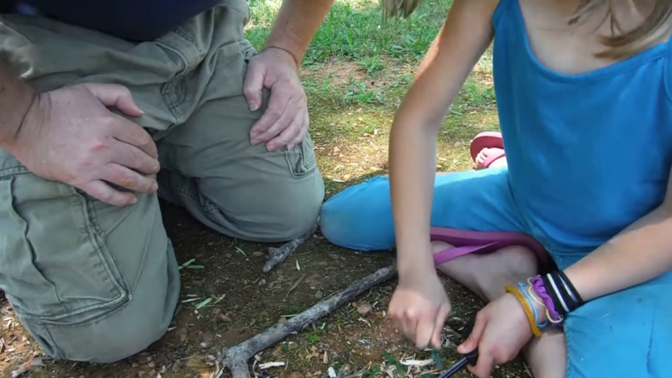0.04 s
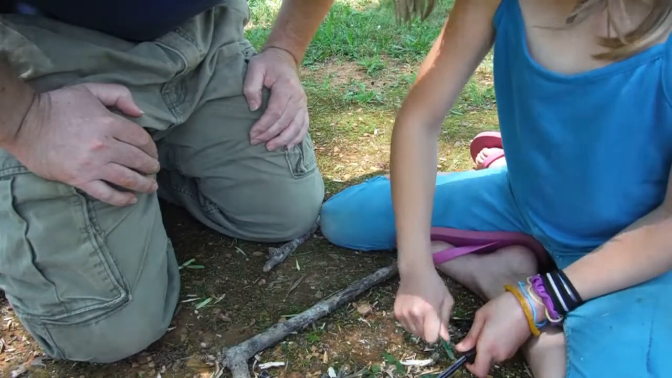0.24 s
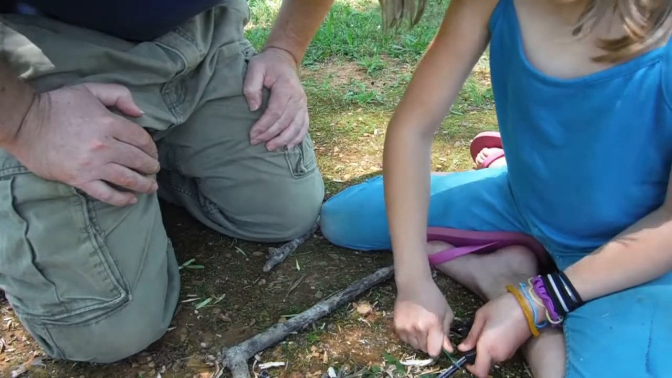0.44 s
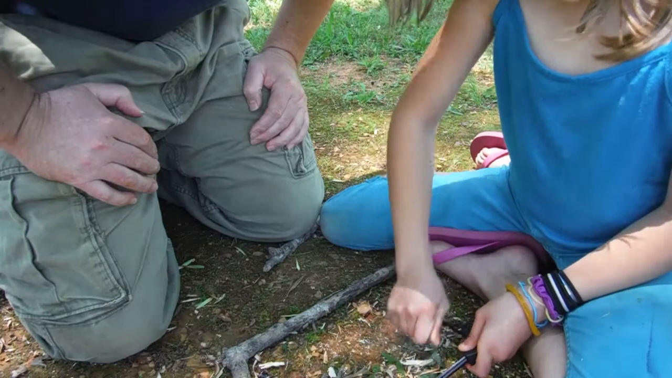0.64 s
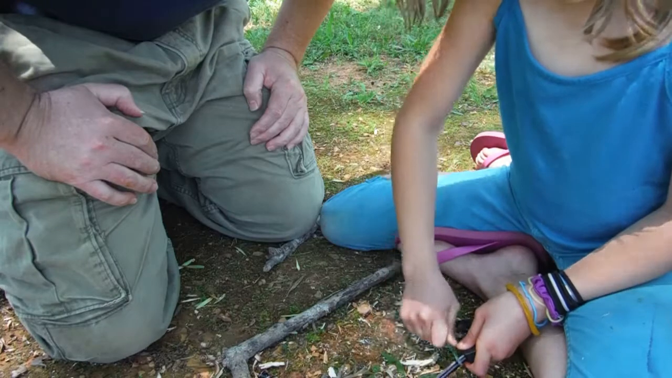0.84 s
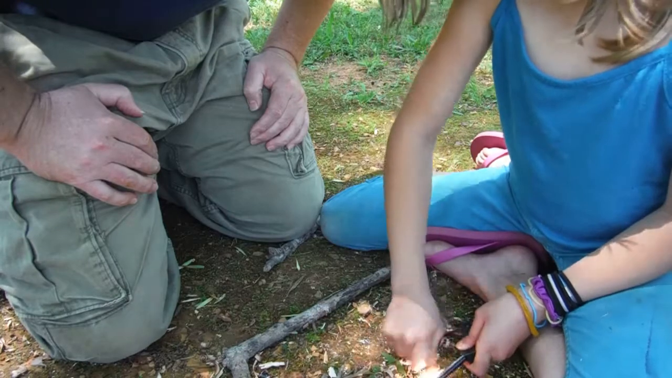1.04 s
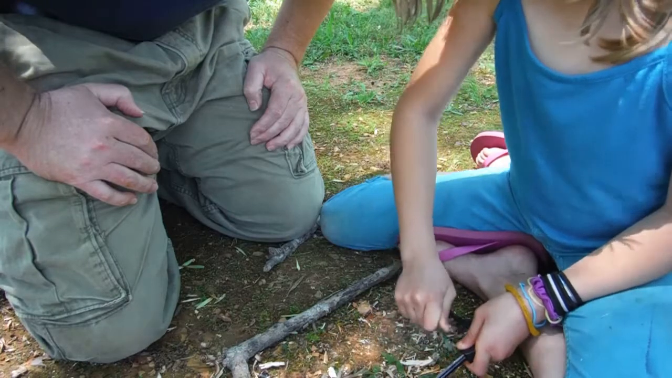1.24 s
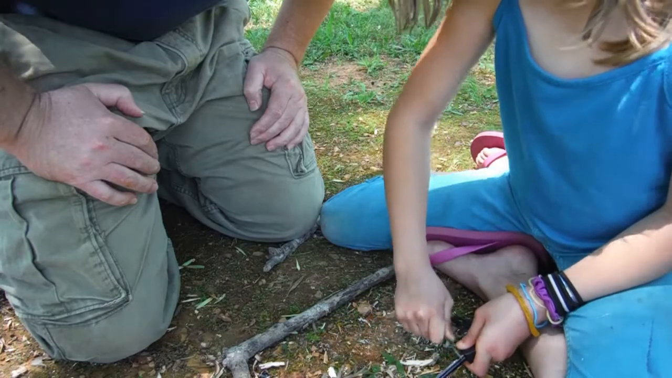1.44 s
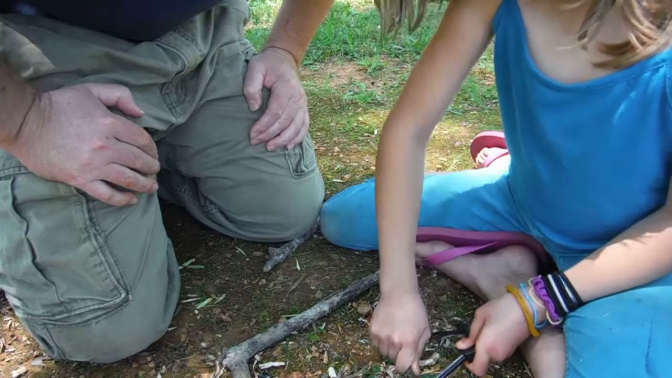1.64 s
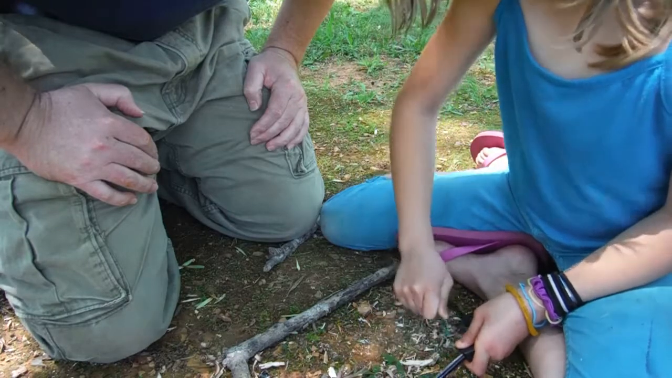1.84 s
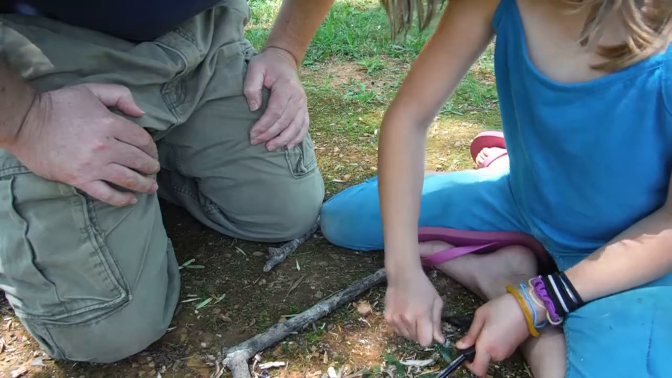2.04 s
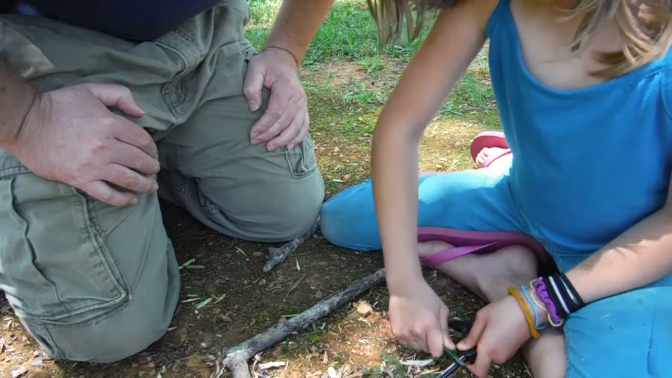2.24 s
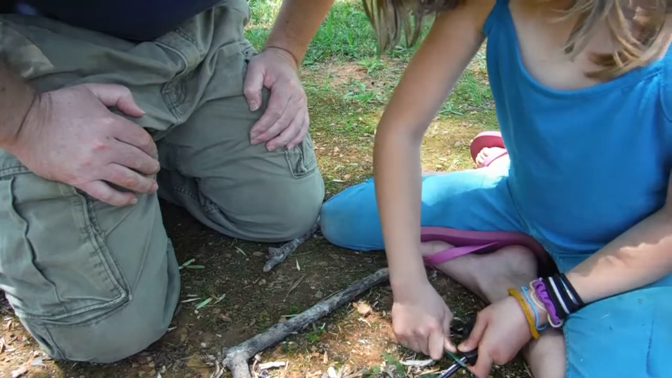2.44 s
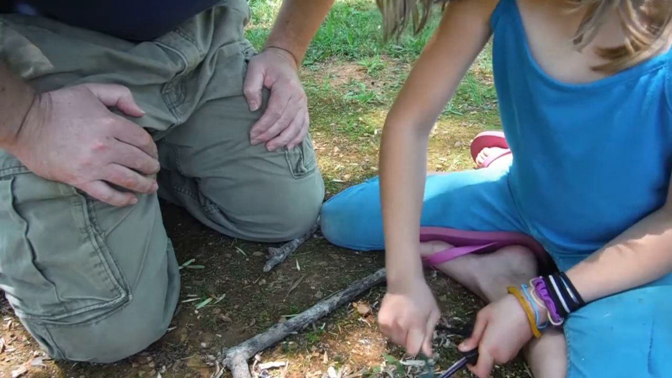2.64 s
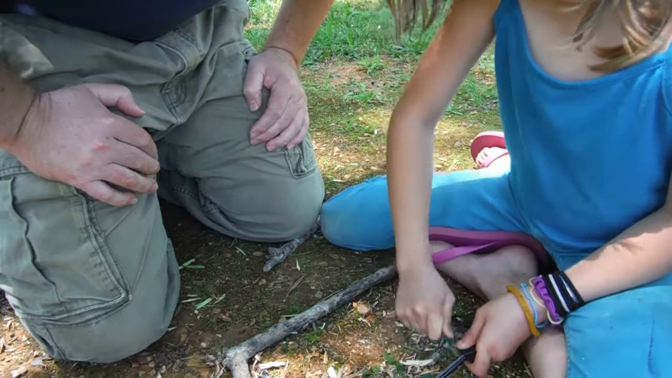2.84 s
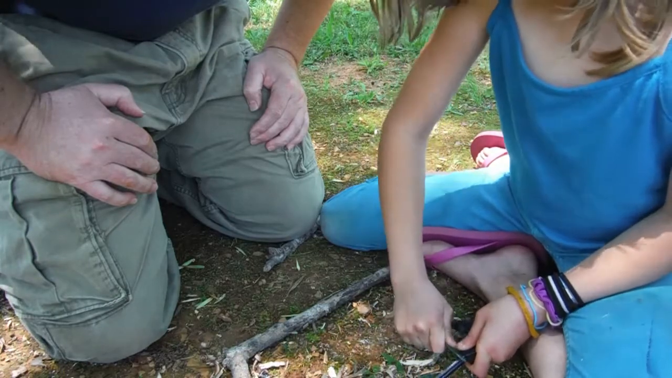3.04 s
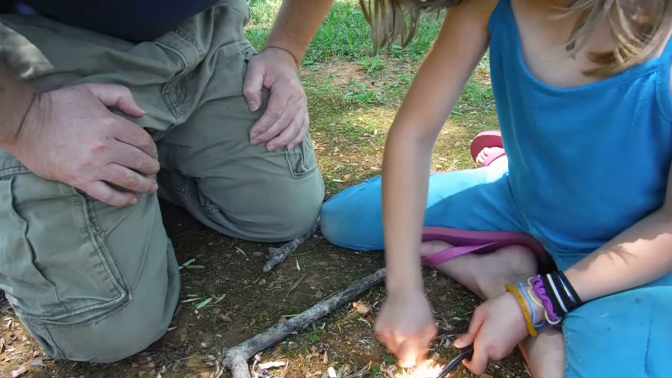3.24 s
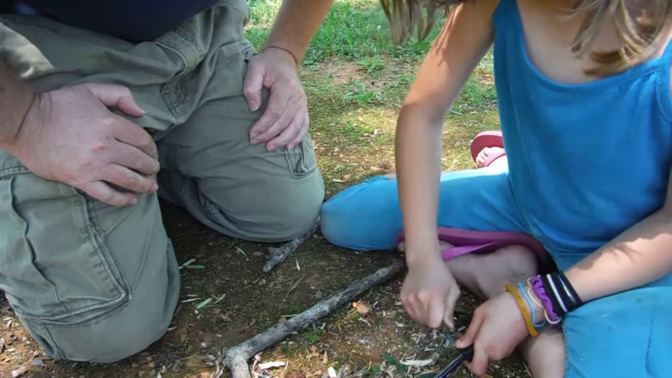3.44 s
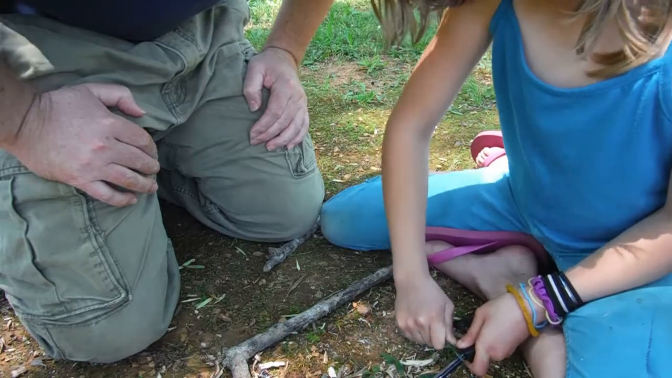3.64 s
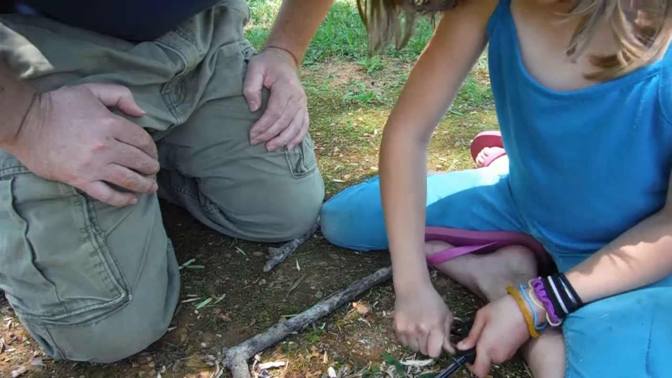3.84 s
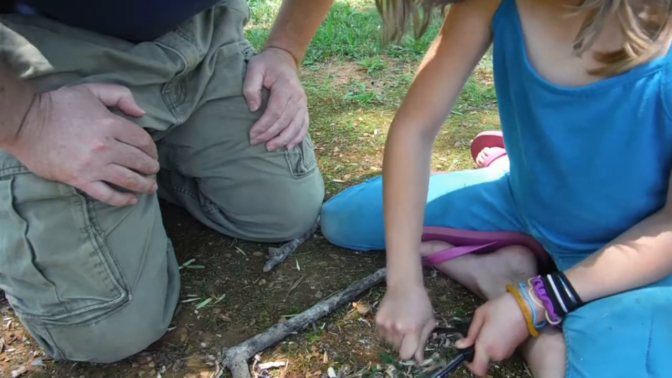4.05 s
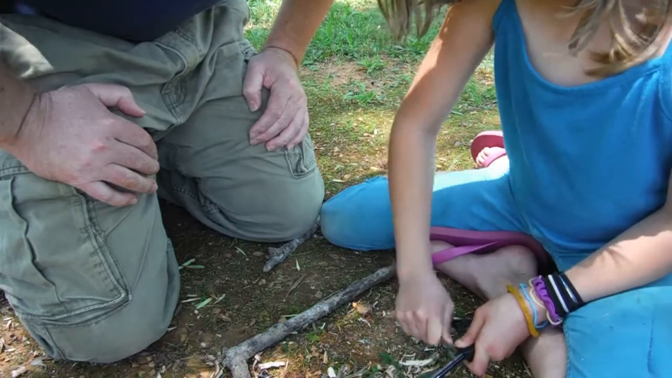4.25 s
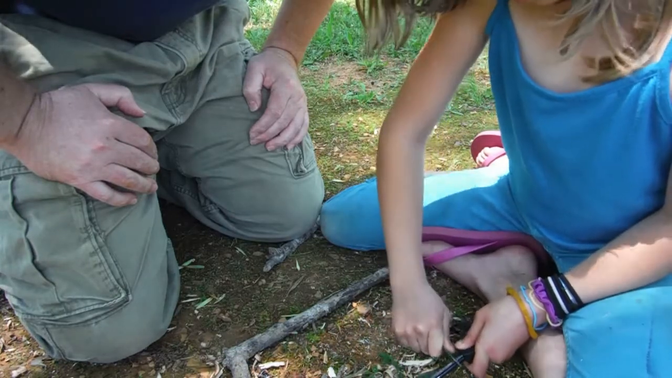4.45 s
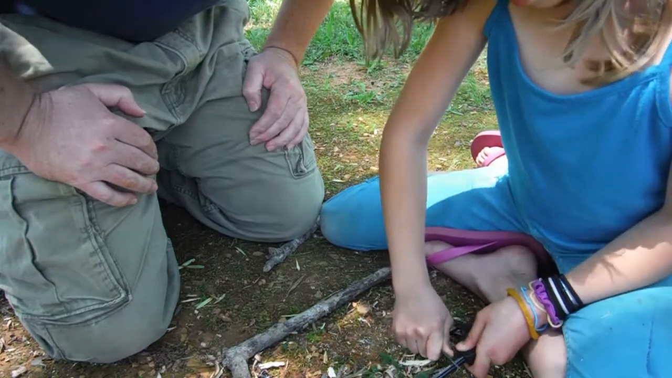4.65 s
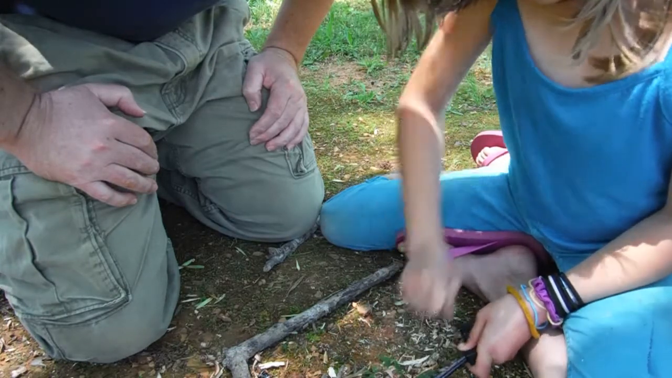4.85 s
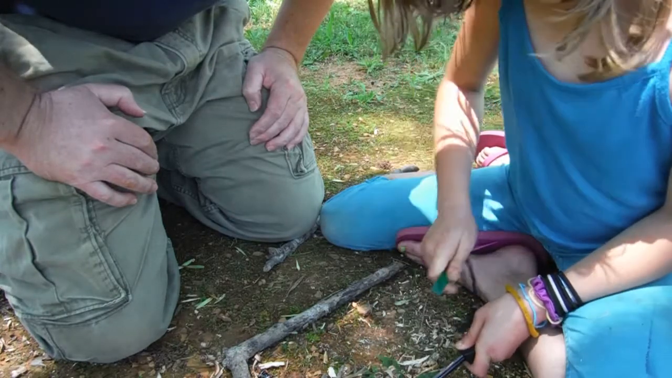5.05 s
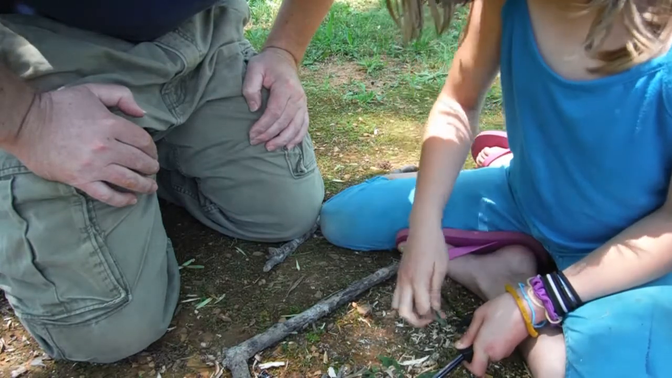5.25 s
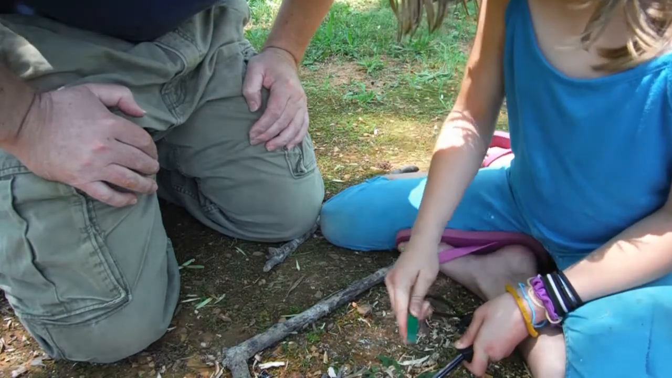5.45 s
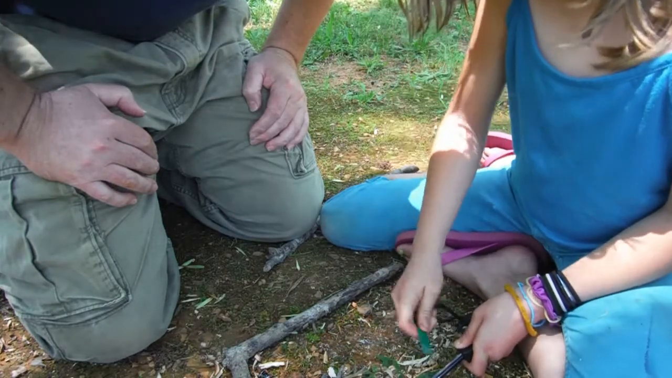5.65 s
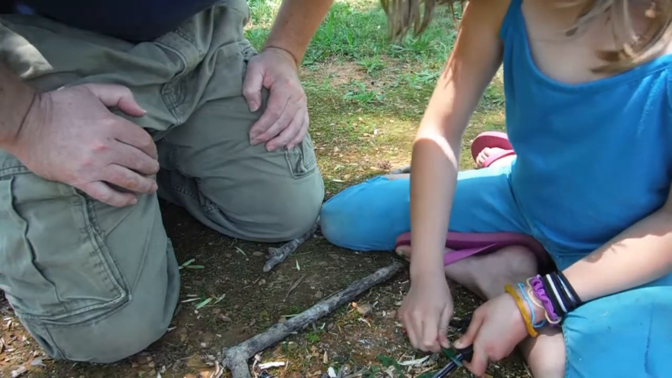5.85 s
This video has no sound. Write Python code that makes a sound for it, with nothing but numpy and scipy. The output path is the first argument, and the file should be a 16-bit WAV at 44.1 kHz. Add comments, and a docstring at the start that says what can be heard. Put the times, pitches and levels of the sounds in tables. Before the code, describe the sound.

About a dozen short, dry rasps of steel on a ferro rod, unevenly spaced, each very brief, with hard clicks as the edge touches the rod again. Sparks spit and pop, and a few strokes catch with a piercing squeak. Behind is soft outdoor rumble, a far engine running down early on, low hum and faint high hiss. Scraping stops before five seconds; then small ticks, dull thuds and a light knock. Near mono pickup, almost no reverberation.

```python
"""Outdoors, near the ground, a steel striker is pushed along a ferro rod again and again.
Strokes are dense random grains through a rasp colour and a steel ring; taps ring, crack and bounce.
Sparks are sparse grains that swell into flares, with spiky pops; the edge catches in short, rough squeaks.
Hands bump the earth and the striker is set down. Behind, filtered noise makes open air, sine stacks make
a far engine that runs down and a hum, and a camera adds a faint whine and hiss."""
import sys
import numpy as np
from scipy import signal
from scipy.fft import rfft, irfft, next_fast_len
from scipy.io import wavfile
from scipy.ndimage import uniform_filter1d, minimum_filter1d, map_coordinates

SR = 44100
rng = np.random.default_rng(int(sys.argv[2]) if len(sys.argv) > 2 else 0)


def to_wav(s):
    """Save 16-bit WAV."""
    ch = np.atleast_2d(s).T  # columns
    pcm = np.round(np.clip(ch, -1, 1) * 32767)  # PCM
    wavfile.write(sys.argv[1], SR, pcm.astype(np.int16))


N = 260190
TIME = np.arange(N) / SR

# pushes along the rod: start_s, press_s, ease_s, level_db where pressing ends,
# swell_db while pressing (negative falls), treble_tilt_db
STROKES = [ (0.0, 0.017, .004, -24, 4.5, -0.5), (.553, .022, 0.066, -25, 5, 2.5),
           (1.049, .04, 0.077, -24.5, 7.5, 0), (1.235, 0.0028, 0.0039, -24.5, -5, 6.5),
           (1.555, 0.087, 0.0036, -21.5, 11.5, 1), (2.572, 0.024, .097, -23.5, 5, 1),
           (3.252, 0.062, 0.015, -22.5, 3.5, 2), (3.817, 0.019, .007, -31.5, 6, 0.5),
           (3.941, .005, 0.0063, -28.5, -1, 1.5), (3.997, .003, .005, -26, 6, -4),
           (4.025, 0.026, 0.0078, -24, 20, -3), (4.644, 0.016, .002, -31.5, -1, 0.5),
           (4.741, 0.038, 0.025, -20, 11, -1.5), ]
# showers of sparks as shavings ignite: peak_s, crackle_db, decay_s
FLARES = [(0.014, -30.5, .004), (0.598, -31, 0.022), (1.094, -34, .005), (1.128, -26, 0.006),
          (1.16, -25.5, 0.0035), (1.638, -23, 0.0051), (2.618, -28, 0.014), (3.309, -22.5, 0.0085),
          (4.049, -36.5, 0.0035), (4.789, -29, 0.0071)]
# striker touching the rod: start_s, level_db averaged over CONTACT_S
TAPS = [(0.3756, -18), (0.532, -30.5), (0.6955, -40), (0.9301, -20), (1.5057, -14.5), (1.549, -32),
        (2.1976, -20.5), (3.0228, -22), (3.1173, -35), (3.357, -36), (3.7073, -27), (3.7759, -39),
        (4.022, -33), (4.1155, -34), (4.3784, -24), (4.834, -34), (5.275, -38.5), (5.2915, -37),
        (5.876, -21.5)]
# loudest sparks bursting: start_s, peak_db
SPARK_POPS = [(.6338, -13), (1.1236, -9.5), (1.1388, -8), (1.6422, -5), (3.3197, -3.5), (4.7676, -12),
              (4.7895, -11), (4.799, -11.5)]
# edge catching and squeaking: peak_s, level_db, pitch_hz, decay_s
CATCHES = [(1.0881, -15, 7000, 0.00046), (1.586, -17, 6400, .0006), (3.2705, -13, 6940, .0005),
           (3.3272, -13, 7150, 0.00035), (3.8229, -23.5, 6500, 0.00045), (3.944, -18, 6900, .0005),
           (3.951, -23, 6500, .0005), (3.999, -17.5, 7480, .0003), (4.042, -19, 5850, 0.0038),
           (4.0488, -2.5, 6440, 0.00037), (4.6476, -23, 5500, 0.00043), (4.659, -19.5, 6060, .0004),
           (4.746, -13.5, 6570, 0.00068), (4.777, -17, 5500, .0016), (4.7814, 7.5, 5630, 0.00085),
           (4.7832, -9.5, 3470, 0.00084)]
# hands bumping the ground: bump_s, peak_db
HAND_BUMPS = [(3.712, -35), (3.818, -32), (3.897, -35), (4.145, -27.5), (4.394, -30.5), (4.647, -19.5),
              (5.785, -33.5), (5.893, -28.5)]

# ring modes of the hand-held striker and rod: pitch_hz, level_db, t60_s
STEEL_MODES = [(2850, -20, 0.024), (4230, -27, 0.017), (5220, 0, 0.012), (5500, 5.5, 0.0043),
               (6320, -12, 0.01), (6760, -17, 0.0051), (7300, -4.5, 0.0043), (7860, -12, 0.008),
               (9140, -7.5, 0.011), (9650, -7.5, 0.0076)]
# filter colour of grains shearing off the rod: freq_hz, gain_db
SHEAR_COLOUR = [(300, -60), (1500, -6.5), (3800, -8.5), (5200, 5), (7300, 2), (9300, 1.5), (10500, -9.5),
                (13000, -13.5), (15800, -21)]
# filter colour of burning sparks: freq_hz, gain_db
CRACKLE_COLOUR = [(100, -6.5), (300, 0.5), (1600, 0), (2300, 0.5), (2800, 5), (3900, -3.5), (5000, 1.5),
                  (9000, 0), (12000, -3.5), (15800, -24)]
# filter colour of the crack in a tap: freq_hz, gain_db
CRACK_COLOUR = [(300, -41), (1700, -18), (2800, -4.5), (4000, -8), (5300, 8), (9500, -5), (11000, -9),
                (15800, -27)]
# filter colour of a hand on soft earth: freq_hz, gain_db
THUD_COLOUR = [(20, -27), (50, -0.5), (90, -0.5), (180, -2), (300, -12), (700, -36), (3000, -75)]
# filter colour of the open air: freq_hz, gain_db
AIR_COLOUR = [(15, -8), (30, 2), (70, -3), (100, -5), (128, -10), (175, -11), (290, -22), (580, -21),
              (1000, -19.5), (2100, -24), (3300, -25), (5000, -21), (6800, -29.5), (9600, -50)]
# filter colour of the camera hiss: freq_hz, gain_db
HISS_COLOUR = [(3000, -24), (6500, -10.5), (7800, 4.5), (8800, -1.5), (9900, -8.5), (10450, -13),
               (10850, -5.5), (11300, -13), (12500, -16.5), (15800, -15.5)]
# filter colours of squeak grit, soil bounce and the striker set down: freq_hz, gain_db
GRIT_COLOUR = [(500, -56), (2000, -5), (3300, 5.5), (6000, 11.5), (9500, 4.0), (12000, -22), (15000, -31)]
SOIL_COLOUR = [(3500, -11.0), (9000, -4)]
SET_DOWN_COLOUR = [(200, -14), (600, 6), (1800, -5), (4500, -8), (12000, -33)]

# drifting open-air levels: time_s, rumble_db, wash_db, rustle_db
AIR_LEVELS = [(0, -37.5, -42, -43), (.85, -42.5, -43, -45), (2.2, -44, -46, -47), (3.8, -42.5, -47.5, -46),
              (4.95, -46, -48.5, -47), (5.9, -40.5, -48.5, -47.5)]
# far engine before it fades: time_s, level_db
ENGINE_LEVELS = [(0, -31), (.5, -37.5), (1.0, -35.5), (1.9, -41)]
# engine firing tone, then its overtones: level_db
EXHAUST_DB = [0, -16.5, -18.5]
# background hum tones: pitch_hz, level_db
HUM_TONES = [(99, -47.5), (159, -56)]
# thin top lines of the camera whine: pitch_hz, level_db
WHINE_LINES = [(11835, -70.5), (15734, -63), (15747, -65)]

BITE_S, EASE_DB, LIFT_DB_PER_S = 0.0023, 8, 900  # stroke attack, fall while easing, release
DRAG_DB, DRAG_DB_PER_S = -19, 168  # the lifted edge trails over the rod
EMBER_DB = -19.5  # crackle that goes with any scraping, relative to the stroke level
FLARE_SNAP = 1.32  # a flare grows this many times faster than it dies
CONTACT_S = .004
IDLE_HZ, SHUT_OFF_S, COAST_S, FADE_DB_PER_S = 70.6, 2.0, 1.7, 24  # the engine slows and fades
TOP_HZ = 16000


def amp(db):
    """Decibels to gain."""
    return 10 ** (np.asarray(db) / 20)


def unit(x):
    """Scale to rms 1."""
    return x / np.sqrt(np.mean(x ** 2) + 1e-20)


def curves(rows):
    """One value per sample for each column after the time."""
    time_s, *columns = np.transpose(rows)
    return [np.interp(TIME, time_s, column) for column in columns]


def wobble(rate):
    """A smooth random curve with rate knots a second."""
    knots = rng.standard_normal(int(N * rate / SR) + 4)
    return map_coordinates(knots, [TIME * rate])


def coloured(x, points):
    """Causal minimum-phase filter through (freq_hz, gain_db) points."""
    size = 2 * next_fast_len(len(x) // 2 + 4096)
    freq_hz, gain_db = np.transpose(points)
    log_hz = np.log(np.fft.rfftfreq(size, 1 / SR) + 1)
    gain = amp(np.interp(log_hz, np.log(freq_hz), gain_db))
    # folding the cepstrum forward keeps energy from leading the attack
    cepstrum = irfft(np.log(gain + 1e-6))
    cepstrum[1:size // 2] *= 2
    cepstrum[size // 2 + 1:] = 0
    response = np.exp(rfft(cepstrum))
    return irfft(rfft(x, size) * response, size)[:len(x)]


def add(track, start_s, sound):
    """Mix a sound into the track from start_s."""
    start = max(round(start_s * SR), 0)
    part = track[start:start + len(sound)]
    part += sound[:len(part)]


def swell(t, decay_s, snap):
    """A rounded peak at t = 0 that rises snap times faster than it dies."""
    speed = np.where(t < 0, snap, 1)
    return 1 / np.cosh(np.clip(t / decay_s * speed, -20, 20))


def grains(rate, spread_db):
    """Tiny impulses of random sign and size, on average rate a second."""
    size_db = spread_db * np.clip(rng.standard_normal(N), -2, 2)
    sizes = amp(size_db) * np.sign(rng.standard_normal(N))
    return sizes * (rng.random(N) < rate / SR)


def steel_ring(detune, attack_s=.0001):
    """Decaying steel modes, their pitch, level and phase shifted at random each time."""
    t = np.arange(SR // 40) / SR
    pitch_hz, level_db, t60_s = np.transpose(STEEL_MODES)[:, :, None]
    size, shift, phase = rng.standard_normal((3, len(STEEL_MODES), 1))
    envelopes = amp(level_db + 2 * size - 60 * t / t60_s)
    modes = envelopes * np.sin(2 * np.pi * (pitch_hz * (1 + detune * shift) * t + phase))
    wave = modes.sum(0) * (1 - np.exp(-t / attack_s))
    return wave / np.linalg.norm(wave)


def stroke_level(start_s, press_s, ease_s, swell_db):
    """The edge bites, bears down, eases and lifts, trailing lightly; gain is 1 where pressing ends."""
    t = TIME - start_s
    force_db = np.interp(t, [0, press_s, press_s + ease_s], [-swell_db, 0, -EASE_DB])
    lifted_s = np.maximum(t - press_s - ease_s, 0)
    released_db = force_db - LIFT_DB_PER_S * lifted_s
    drag_db = DRAG_DB - DRAG_DB_PER_S * lifted_s
    return np.clip(t / BITE_S, 0, 1) * amp(np.maximum(released_db, drag_db))


def strokes(rock_db=2.0, judder_db=2.5, steel_db=-18.0):
    """The edge shears grains off the rod; they crackle faintly all along and louder where they flare."""
    shear = grains(rate=6000, spread_db=2.5)
    rasp = unit(coloured(shear, SHEAR_COLOUR))
    freq_hz = np.fft.rfftfreq(N, 1 / SR)
    dull = irfft(rfft(rasp) / (1 + (freq_hz / 7000) ** 8), N)
    bright = rasp - dull
    rocking_db = rock_db * wobble(90)  # the edge rocks in the hand: brighter and duller by turns
    judder = unit(amp(judder_db * wobble(200)))  # stick-slip breaks the rasp into short bites
    sparks = unit(coloured(grains(rate=2500, spread_db=5), CRACKLE_COLOUR))
    out = np.zeros(N)
    for start_s, press_s, ease_s, level_db, swell_db, tilt_db in STROKES:
        tilt = amp(tilt_db + rocking_db)
        grit = unit(dull / tilt + tilt * bright)
        steel = unit(signal.oaconvolve(shear, steel_ring(detune=0.029))[:N])
        scrape = judder * (grit + amp(steel_db) * steel)
        level = amp(level_db) * stroke_level(start_s, press_s, ease_s, swell_db)
        out += level * (scrape + amp(EMBER_DB) * sparks)
    for peak_s, crackle_db, decay_s in FLARES:
        out += amp(crackle_db) * swell(TIME - peak_s, decay_s, FLARE_SNAP) * sparks
    return out


def ground(x, bounce_s=0.00154, bounce_db=-11, wet_db=-16, t60_s=0.032):
    """Earth under the rod returns one quick copy; knees and grass scatter a brief, weak tail."""
    t = np.arange(SR // 10) / SR
    tail = rng.standard_normal(len(t)) * amp(-60 * t / t60_s) * (t > .002)
    out = x + amp(wet_db) * signal.oaconvolve(x, tail / np.linalg.norm(tail))[:N]
    add(out, bounce_s, amp(bounce_db) * coloured(x, SOIL_COLOUR))
    return out


def outdoors():
    """Open-air noise in three bands, each drifting on its own: rumble, distant wash and high rustle."""
    air = rfft(coloured(rng.standard_normal(N), AIR_COLOUR))
    freq_hz = np.fft.rfftfreq(N, 1 / SR)

    def band(low_hz, high_hz):
        """One slice of the air at rms 1."""
        inside = (freq_hz >= low_hz) & (freq_hz < high_hz)
        return unit(irfft(air * inside, N))

    rumble_db, wash_db, rustle_db = curves(AIR_LEVELS)
    rumble = amp(rumble_db + 2.2 * wobble(7)) * band(22, 250)
    wash = amp(wash_db + .4 * wobble(9)) * band(250, 3200)
    rustle = amp(rustle_db + 1.45 * wobble(18)) * band(3200, 9000)
    return rumble + wash + rustle


def engine():
    """A far engine's firing tone and overtones idle unevenly, then sink in pitch and fade once shut off."""
    idle_db, = curves(ENGINE_LEVELS)
    coasting_s = np.maximum(TIME - SHUT_OFF_S, 0)
    pitch_hz = IDLE_HZ * np.exp(-coasting_s / COAST_S)
    level_db = idle_db - FADE_DB_PER_S * coasting_s
    phase = 2 * np.pi * np.cumsum(pitch_hz * (1 + 0.0048 * wobble(7.7))) / SR
    exhaust = sum(amp(db) * np.sin(k * phase) for k, db in enumerate(EXHAUST_DB, 1))
    return np.sqrt(2) * amp(level_db + 0.74 * wobble(11.9)) * exhaust


def hum():
    """Low sine tones go on throughout, wavering in level and phase."""
    out = np.zeros(N)
    for pitch_hz, level_db in HUM_TONES:
        level = amp(level_db + 2.2 * wobble(5.02))
        out += level * np.sin(2 * np.pi * pitch_hz * TIME + 0.84 * wobble(6))
    return np.sqrt(2) * out


def camera(tone_db=-45.0, hiss_db=-48.5):
    """The camera's whine: a tone flipping sign once per picture field, thin top lines that beat, and hiss."""
    tone_hz, field_hz = 7867, 59.94
    flips = np.tanh(8 * np.sin(np.pi * field_hz * TIME))
    whine = amp(tone_db) * flips * np.sin(2 * np.pi * tone_hz * TIME)
    for pitch_hz, level_db in WHINE_LINES:
        whine += amp(level_db) * np.sin(2 * np.pi * pitch_hz * TIME + 0.067 * wobble(30))
    hiss = unit(coloured(rng.standard_normal(N), HISS_COLOUR))
    return np.sqrt(2) * whine + amp(hiss_db) * hiss


def taps(crack_db=-3, crack_t60_s=0.013, graze_t60_s=0.02, firm_db=-24, bounce_db=-7, bounce_s=0.0014):
    """A firm touch cracks and rings the steel, a light one mostly grazes; each bounces once."""
    out = np.zeros(N)
    for start_s, level_db in TAPS:
        firm = min(amp(level_db - firm_db), 1)
        tone = firm * steel_ring(detune=0.027)
        t = np.arange(len(tone)) / SR
        t60_s = firm * crack_t60_s + (1 - firm) * graze_t60_s
        crack = coloured(rng.standard_normal(len(t)) * amp(-60 * t / t60_s), CRACK_COLOUR)
        tap = tone + amp(crack_db) * crack / np.linalg.norm(crack)
        tap *= amp(level_db) * np.sqrt(CONTACT_S * SR) / np.linalg.norm(tap)
        add(out, start_s, tap)
        delay_s = bounce_s * (.5 + rng.random())
        add(out, start_s + delay_s, amp(bounce_db) * tap)
    return out


def pops(t60_s=0.0031):
    """A burning fleck bursts: one sharp spike and a short spit."""
    out = np.zeros(N)
    t = np.arange(SR // 50) / SR
    for start_s, peak_db in SPARK_POPS:
        spit = 0.18 * rng.standard_normal(len(t)) * amp(-60 * t / t60_s)
        pop = coloured((t == 0) + spit, CRACKLE_COLOUR)
        add(out, start_s, amp(peak_db) * pop / np.abs(pop).max())
    return out


def catches(rough=0.66, grit_db=-10, snap=1.8):
    """The edge digs in and chatters briefly: a rough squeak that snaps up and dies."""
    out = np.zeros(N)
    grit = unit(coloured(rng.standard_normal(N), GRIT_COLOUR))
    drift = rough * wobble(2500)  # phase jitter in radians
    for peak_s, level_db, pitch_hz, decay_s in CATCHES:
        near = np.abs(TIME - peak_s) < .02
        t = TIME[near] - peak_s
        squeak = np.sin(2 * np.pi * pitch_hz * t + drift[near])
        out[near] += amp(level_db) * swell(t, decay_s, snap) * (squeak + amp(grit_db) * grit[near])
    return out


def bumps(push_s=0.0053):
    """A hand pushes once on soft earth: a noisy, decaying push filtered to a dull thud."""
    out = np.zeros(N)
    t = np.arange(SR // 10) / SR
    for bump_s, peak_db in HAND_BUMPS:
        push = (1 - t / push_s + rng.standard_normal(len(t))) * np.exp(-t / push_s)
        thud = coloured(push, THUD_COLOUR)
        add(out, bump_s - .004, amp(peak_db) * thud / np.abs(thud).max())
    return out


def set_down(start_s=5.7, peak_db=-31, t60_s=0.024):
    """The striker is set down on the ground: decaying coloured noise, one small, mid-pitched knock."""
    out = np.zeros(N)
    t = np.arange(SR // 10) / SR
    knock = coloured(rng.standard_normal(len(t)) * amp(-60 * t / t60_s), SET_DOWN_COLOUR)
    add(out, start_s, amp(peak_db) * knock / np.abs(knock).max())
    return out


def scene():
    """Everything reaches one microphone, alike in both channels."""
    handwork = ground(strokes() + taps() + pops() + catches() + set_down())
    background = outdoors() + engine() + hum() + camera()
    mono = handwork + bumps() + background
    return np.array([mono, mono])


def record(dry):
    """A fast limiter holds the sharpest peaks down, then everything from TOP_HZ up is cut."""
    needed = np.minimum(1, .98 / (np.abs(dry).max(0) + 1e-9))
    gain = uniform_filter1d(minimum_filter1d(needed, size=31), size=31)
    size = next_fast_len(N + SR // 10)
    kept = np.fft.rfftfreq(size, 1 / SR) < TOP_HZ
    return irfft(rfft(dry * gain, size) * kept, size)[:, :N]


dry = scene()
out = record(dry)
to_wav(out)
```